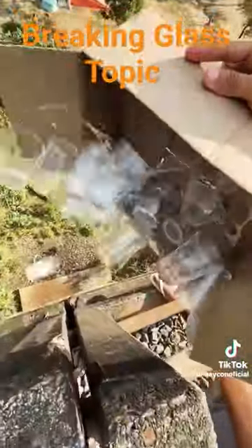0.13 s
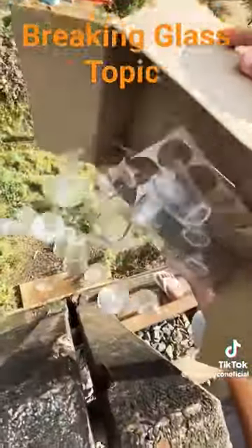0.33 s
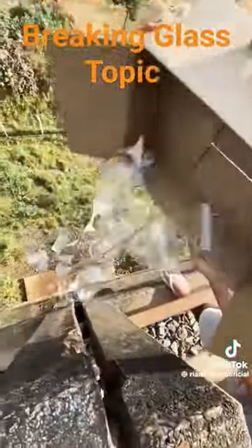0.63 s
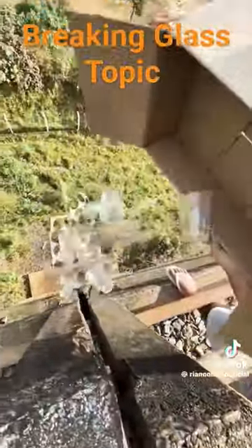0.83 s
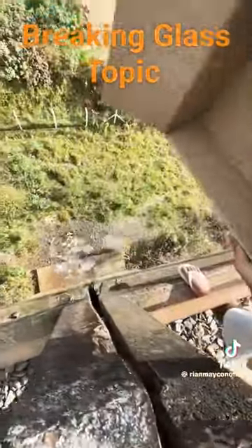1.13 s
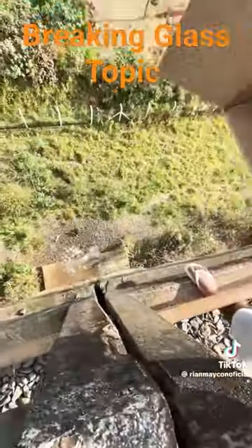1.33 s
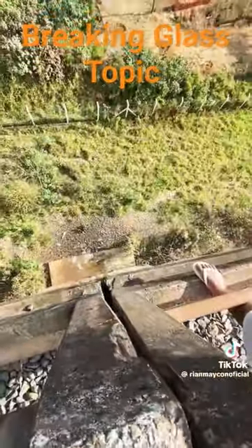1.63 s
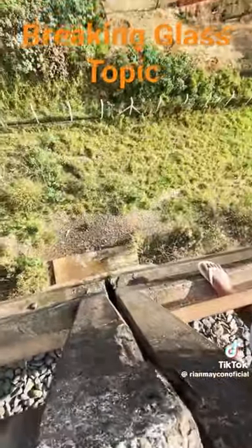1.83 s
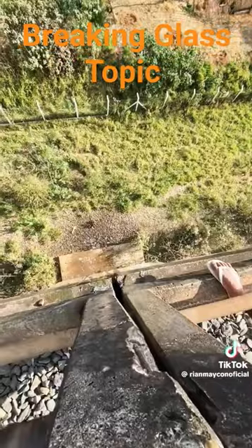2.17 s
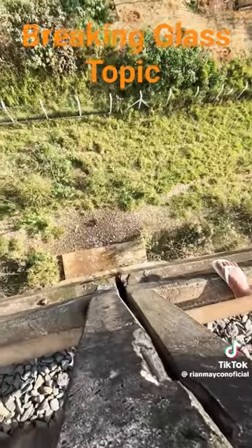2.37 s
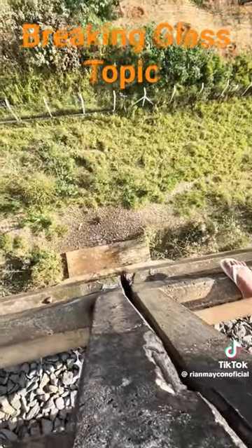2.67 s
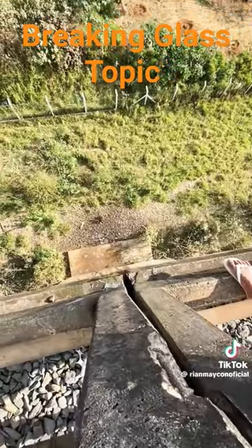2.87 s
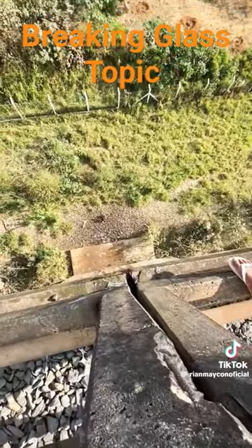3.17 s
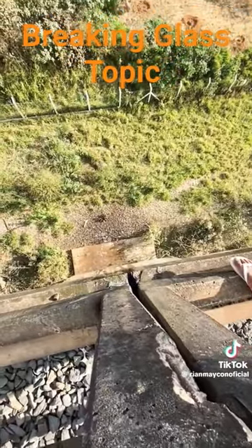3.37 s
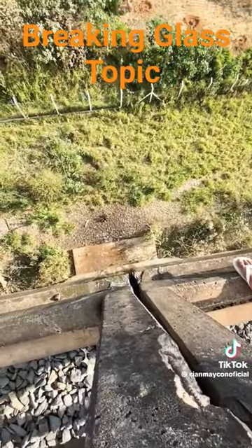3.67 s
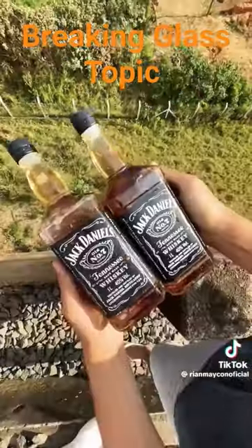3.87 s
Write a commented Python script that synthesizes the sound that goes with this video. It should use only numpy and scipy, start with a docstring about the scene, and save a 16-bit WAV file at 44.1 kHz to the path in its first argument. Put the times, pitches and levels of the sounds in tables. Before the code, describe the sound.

Glass cups grind and chink loudly as they tip from a cardboard box close to the microphone, a few clink in midair, then many smash far below with tinkling shards and light wind.

```python
"""Glass cups grind and chink in a box tipped off a high bridge, then clink freely in the air.
From about two seconds they smash far below; shards tinkle, a few notes ring on, light wind buffets.
Cups are sums of decaying bending modes that beat with spin; heap, splinters and grit are random
contacts through fixed spectra; wind is lumpy low noise. Two microphone ports hear it all in stereo."""
import sys
import numpy as np
from scipy import signal
from scipy.fft import rfft, irfft
from scipy.io import wavfile
from scipy.ndimage import uniform_filter1d

SR = 44100
rng = np.random.default_rng(int(sys.argv[2]) if len(sys.argv) > 2 else 0)


def inscribe(sig):
    """Save sig as 16-bit PCM at rate SR to the path in sys.argv[1].

    A 1-D sig is mono; a 2-D sig holds one channel per row.
    Samples are clipped to [-1, 1] before scaling.
    """
    pcm = np.round(np.clip(np.atleast_2d(sig).T, -1, 1) * 32767)
    wavfile.write(sys.argv[1], SR, pcm.astype(np.int16))


N = 176400  # samples, 4 s

# bending modes of a cup: mode_hz, air_t60_s, heap_t60_s, relative_level_db
CUP_MODES = [(1774.3, 0.9, 0.14, -3.5), (4545, 0.34, 0.21, -0.5), (8259, 0.2, 0.11, -1),
             (11500, .2, 0.14, -16.5), (14480, .15, .1, -33)]
# largest departure of each mode between cups in the heap: [fraction of mode_hz]
MODE_SPREAD = [0.0047, .011, 0.018, 0.012, 0.024]
# spectrum of flying splinters and shards: frequency_hz, relative_level_db
SPLINTER_SPECTRUM = [(300, -78), (700, 3.5), (1000, 1.5), (2500, 3.5), (5000, 5), (7000, 2), (8500, 4),
                     (10500, 5), (12500, -4), (15500, -28)]
HOLLOW_HZ = 940  # nominal resonance of the air in a cup
TICK_S = 0.0019  # decay constant of a tick's scatter


def box():
    """Colliding bodies: random contacts excite a heap of damped cups, with harder knocks on top."""
    # loudness of the sliding heap: time_s, relative_level_db
    heap_curve = [(0.0, -24), (0.018, -24.5), (0.172, -27.5), (0.2, -30.5), (0.348, -30.5), (0.362, -31.5),
                  (0.432, -30), (0.472, -36), (0.74, -34.5), (0.95, -61)]
    # spectrum of glass rattling in cardboard: frequency_hz, relative_level_db
    rattle = [(100, -27), (250, -6.5), (400, 1), (680, -3), (950, -3), (1300, -9.5), (2400, 2),
              (3700, -3.5), (5300, 3), (6800, -7.5), (8500, 2), (10200, -7), (12000, -8.5), (15500, -37.5)]
    # ring of the heap in each cup mode: [relative_level_db]
    heap_ring_db = [-5.5, 0.5, -4.5, -19.5, -33]
    # knocks: start_s, then relative levels peak_db, low_ring_db, middle_ring_db, high_ring_db, clatter_db
    knock_table = [(0.0004, -10.5, -21.5, -16.5, -37.5, -48), (0.0242, -9.5, -22, -28.5, -17.5, -32.5),
                   (0.0543, -3, -18.5, -18.5, -17, -29.5), (0.0836, -10.5, -26, -30.5, -27, -35.5),
                   (0.1132, -30, -32, -21, -21, -33), (0.1214, -11.5, -35, -21, -18.5, -42),
                   (0.1549, -13.5, -28.5, -17.5, -23, -30.5), (0.1624, -6.5, -29.5, -13, -20, -23),
                   (0.2398, -19.5, -26, -21, -25, -23), (0.2931, -20, -32.5, -23, -24.5, -35),
                   (0.311, -14, -29.5, -21.5, -25, -42), (0.3411, -14, -38, -39, -15.5, -26),
                   (0.3503, -9, -50.5, -35.5, -18.5, -40), (0.4001, -16, -34.5, -33.5, -32.5, -26),
                   (0.408, -17, -41.5, -29.5, -20.5, -21.5), (0.4194, -6, -37.5, -35.5, -12, -20),
                   (0.43, -11.5, -35.5, -33, -33.5, -29), (0.4843, -21, -51.5, -39.5, -25, -37.5),
                   (0.5292, -11, -38, -31.5, -35, -46), (0.5608, -20.5, -23, -55.5, -34, -33.5),
                   (0.5957, -21.5, -33.5, -20, -27, -30.5), (0.6043, -12.5, -44.5, -34, -20, -36.5),
                   (0.6132, -25, -21.5, -24.5, -20.5, -29.5), (0.6872, -40.5, -26, -26, -50.5, -33.5),
                   (0.713, -45, -19, -24, -58, -30.5)]
    # trim of the low, middle and high rings of every knock: [gain_db]
    ring_trim_db = [-4, 0.5, 1.5]
    contacts_per_s, clatter_decay_s = 800, 0.0065

    fade = np.clip((1 - np.arange(N) / SR) / .1, 0, 1)  # silent from 1 s on
    slide = level(heap_curve) * fade
    contacts = clicks(N, contacts_per_s, spread_db=2.8)
    hiss = .15 * rng.standard_normal(N)
    out = amp(-4.5) * slide * unit(colour(contacts + hiss, rattle))
    chinks = pings(0, 1, 260, slide, rattle, t60=0.056, low_hz=1870, high_hz=9620, range_db=15)
    out += amp(2) * chinks

    for (hz, _, t60, _), spread, db in zip(CUP_MODES, MODE_SPREAD, heap_ring_db):
        for own in np.linspace(-1, 1, num=6):  # six slightly different cups
            mode = ring(hz * (1 + spread * (own + 0.14 * rng.standard_normal())), t60)
            strikes = unit(clicks(SR, contacts_per_s / 4, spread_db=1.6)) * slide[:SR]
            ringing = signal.fftconvolve(strikes, mode / np.linalg.norm(mode))
            add(out, 0, amp(db - 8) * ringing)

    for s, peak_db, low_db, mid_db, high_db, clatter_db in knock_table:
        rings_db = np.add([low_db, mid_db, high_db], ring_trim_db)
        add(out, s, wall_modes(rings_db, rng.uniform(3, 19), free=False))
        clatter = amp(clatter_db + 7) * snap(rattle, clatter_decay_s)
        peak = amp(peak_db - 20) * snap(rattle, TICK_S)
        add(out, s, clatter + peak)
    return out


def free_cups():
    """Free vibration: a clink is a tick, a hoot of the hollow and the beating ring of a spinning cup."""
    # clinks: start_s, tick_db, hollow_db, low_ring_db, middle_ring_db, high_ring_db, lowest_mode_beat_hz
    clink_table = [(0.717, -35, -50, -37, -19, -51, 2.3), (.7505, -14.5, -44, -36, -45, -54, 2.7),
                   (0.7891, -17, -18.5, -60, -38, -32.5, 19), (0.8052, -30.5, -27, -25, -29.5, -30, 23.8),
                   (0.949, -43.5, -46.5, -40.5, -49.5, -45.5, 2.5),
                   (1.0082, -44.5, -44.5, -63, -48.5, -50, 5.1), (1.0503, -13.5, -25, -42, -41, -43, 10),
                   (1.1886, -13, -30, -22, -28, -32, 13.7), (1.4639, -65, -68, -55, -61, -69, 11.94),
                   (2.8222, -26.5, -29.5, -35, -54.5, -38.5, 26.4), (3.107, -66, -74, -44, -67.5, -48, 7),
                   (3.24, -76, -66, -56, -62, -81, 1.2), (3.768, -60, -83, -54, -47.5, -59.5, 4)]
    # spectrum of the tick: frequency_hz, relative_level_db
    tick_spectrum = [(200, -32.5), (600, 0.5), (1000, 7.5), (2000, 2.5), (3800, 6.5), (6000, -9),
                     (8500, -3), (11000, 0), (15500, -23.5)]
    # weaker modes of a freely struck cup: mode_hz, t60_s, level_relative_to_low_ring_db
    overtones = [(3560, .45, -26), (4620, .14, -8), (6352, .13, -28), (7030, .14, -28)]
    hollow_t60_s = .06

    out = np.zeros(N)
    for s, tick_db, hollow_db, low_db, mid_db, high_db, beat_hz in clink_table:
        add(out, s, amp(tick_db) * snap(tick_spectrum, TICK_S, scatter=0.69))
        hollow_hz = HOLLOW_HZ * (1 + 0.025 * rng.uniform(-1, 1))
        add(out, s, amp(hollow_db) * ring(hollow_hz, hollow_t60_s))
        add(out, s, wall_modes([low_db, mid_db, high_db], beat_hz, free=True))
        spin = 1.26 + 0.27 * np.cos(2 * np.pi * beat_hz * np.arange(SR) / SR)
        weak_modes = sum(amp(low_db + db) * ring(hz, t60) for hz, t60, db in overtones)
        add(out, s, spin * weak_modes)
    return out


def wall_modes(levels_db, beat_hz, free, detune=0.00281):
    """Modal superposition: bending modes of one cup, which spin makes beat, the higher ones faster."""
    t, out = np.arange(SR) / SR, np.zeros(SR)
    for k, (hz, air_t60, heap_t60, db) in enumerate(CUP_MODES):
        spread = detune if free else MODE_SPREAD[k]
        own = 1 + spread * rng.uniform(-1, 1)
        turn = np.pi * beat_hz * (k + 2) / 2 * t
        mode = ring(hz * own, air_t60 if free else heap_t60)
        # the third level serves every higher mode
        out += amp(db + levels_db[min(k, 2)]) * mode * (np.cos(turn) + 0.19)
    return out


def smashes():
    """Brittle fracture: each burst is a broadband crack, a brief hoot and a decaying splinter spray."""
    # smashes: start_s, crack_db, brightness_db_per_octave, hollow_db, spray_db
    smash_table = [(1.8927, -49.5, -4.5, -80, -63), (1.952, -56, 4.5, -74.5, -59),
                   (1.9735, -24.5, -2, -55, -51.5), (2.0604, -41.5, -6, -55, -60),
                   (2.1656, -32.5, 7.5, -43, -54.5), (2.2133, -29, -2.5, -35.5, -42),
                   (2.2222, -20.5, 0, -39, -39.5), (2.241, -34.5, -12, -29, -41),
                   (2.2597, -36, 6, -46, -55), (2.2752, -25, 4, -26.5, -38), (2.3615, -22.5, 1.5, -36, -46),
                   (2.3728, -19.5, -1, -40, -62), (2.448, -64, -2, -65, -56), (2.462, -40.5, 4, -47, -63),
                   (2.5577, -32, 1, -47, -54), (2.6648, -23, -1, -38.5, -42),
                   (2.674, -31.5, 11, -37.5, -61), (2.6838, -24, -1.5, -62, -58),
                   (2.7732, -30.5, 6, -41.5, -44.5), (2.8045, -41, 7, -48, -45.5),
                   (2.8235, -28.5, 12.5, -59, -54), (2.8815, -59, 13, -60, -54),
                   (2.8865, -28, 8.5, -51, -42), (2.9187, -23, -2.5, -50.5, -44),
                   (2.9415, -23.5, 3, -43, -48), (3.08, -45, 8, -48, -48.5), (3.107, -29.5, 11, -67, -49),
                   (3.157, -32.5, 11.5, -70, -63), (3.4128, -40, 15.5, -81, -73),
                   (3.4602, -45, 13, -63, -53.5), (3.4931, -38.5, 18, -89, -67.5),
                   (3.7331, -36.5, 17, -83.5, -58.5), (3.8498, -40.5, 8.5, -94, -72.5)]
    # spectrum of the crack: frequency_hz, relative_level_db
    crack_spectrum = [(200, -37), (650, -20.5), (1100, 3), (2000, 0), (2700, -1), (4500, 0.5),
                      (6500, -12.5), (8500, -14), (11000, -13.5), (15500, -46)]
    crack_decay_s, spray_decay_s, splinters_per_s = .0011, 0.029, 1000

    out, t = np.zeros(N), np.arange(SR // 2) / SR
    for s, crack_db, tilt_db, hollow_db, spray_db in smash_table:
        add(out, s, amp(crack_db) * snap(crack_spectrum, crack_decay_s, tilt_db, scatter=.4))
        hoot = ring(HOLLOW_HZ * rng.uniform(0.95, 1.164), t60=0.041, count=8000)
        add(out, s, amp(hollow_db) * hoot)
        contacts = clicks(len(t), splinters_per_s, spread_db=2.6)
        splinters = unit(contacts + .12 * rng.standard_normal(len(t)))
        spray = colour(splinters * np.exp(-t / spray_decay_s), SPLINTER_SPECTRUM)
        add(out, s, amp(spray_db) * spray)
    return out


def shards():
    """Impact and friction: pieces of many pitches ping and scrape as they come to rest."""
    # loudness of shards skittering over the stones: time_s, relative_level_db
    skitter_curve = [(2.22, -61), (2.342, -54.5), (2.506, -63), (2.666, -59), (2.814, -54), (3.012, -50.5),
                     (3.266, -55.5), (3.722, -58.5), (3.856, -58.5), (4.0, -74.5)]
    # large shards that ring out: start_s, pitch_hz, level_db
    large_shards = [(2.275, 7940, -42), (2.773, 7840, -41), (2.885, 5720, -45.5), (2.942, 6150, -55),
                    (3.107, 6370, -41), (3.157, 9050, -41), (3.201, 6000, -76), (3.35, 3930, -55),
                    (3.411, 8390, -48), (3.418, 4250, -56.5), (3.482, 2980, -54), (3.492, 8870, -45),
                    (3.565, 5940, -68), (3.627, 5850, -48.5), (3.731, 5850, -60), (3.78, 4574, -43),
                    (3.85, 4550, -48)]
    large_t60_s = .2

    start = skitter_curve[0][0]
    loudness = level(skitter_curve) * (np.arange(N) / SR > start)
    tinkle = pings(start, N / SR, 360, loudness, SPLINTER_SPECTRUM, t60=0.069,
                   low_hz=2900, high_hz=11160, range_db=9)
    out = amp(-3) * tinkle
    for s, hz, db in large_shards:
        add(out, s, amp(db) * ring(hz, large_t60_s))
    grit = unit(colour(clicks(N, 410, spread_db=3.6), SPLINTER_SPECTRUM))
    return out + amp(-8.5) * loudness * grit


def pings(start, end, per_s, loudness, spectrum, t60, low_hz, high_hz, range_db, count=900):
    """Random superposition: glassy notes vary in pitch, size and damping under a loudness curve."""
    out = np.zeros(N)
    for when, pitch, size, damping, chance in rng.random((count, 5)):
        if chance < per_s * (end - start) / count:
            s = start + when * (end - start)
            hz = low_hz + (high_hz - low_hz) * pitch
            gain = loudness[min(int(s * SR), N - 1)] * amp(read(spectrum, hz) - range_db * size)
            add(out, s, gain * ring(hz, t60 * (0.27 + 1.8 * damping), count=9000))
    return out


def wind(flutter_db=3.5, apart=0.87):
    """Turbulent pressure: lumpy low noise, partly independent and partly opposed at the two ports."""
    # steady wind: time_s, relative_level_db
    wind_curve = [(0.0, -68.5), (0.31, -65.5), (0.41, -63), (1.35, -63.5), (1.67, -63.5), (1.83, -71.5),
                  (2.19, -62), (2.66, -74), (2.78, -72.5), (3.03, -71), (3.56, -63.5), (4.0, -72.5)]
    # spectrum of the steady wind: frequency_hz, relative_level_db
    gust_spectrum = [(20, -25), (35, -12), (60, 3.5), (130, 1.5), (250, -2), (400, -14.5), (700, -25.5),
                     (1200, -25.5), (3000, -43.5), (8000, -49.5), (15000, -59)]
    # buffets: start_s, length_s, relative_level_db, brightness_db_per_octave
    buffet_table = [(1.011, 0.21, -54.5, 8.5), (1.364, 0.018, -48.5, 5.5), (1.389, 0.075, -49, -3.5),
                    (1.513, 0.068, -47, -5), (1.581, 0.079, -45, 3.5), (1.681, 0.024, -52.5, 4.5),
                    (1.752, 0.09, -48.5, 4.5), (1.819, 0.082, -44, 2.5), (1.956, 0.072, -48.5, 4),
                    (2.115, 0.072, -46.5, -3.5), (2.187, 0.035, -44.5, 3), (2.524, 0.1, -51, -12),
                    (3.016, 0.076, -47, -5), (3.513, 0.11, -60, -0.5)]
    # spectrum of a buffet: frequency_hz, relative_level_db
    buffet_spectrum = [(20, -8), (70, 6), (160, 2), (350, -1.5), (700, -14.5), (1200, -39), (3000, -54),
                       (15000, -74.5)]

    lumps = unit(uniform_filter1d(uniform_filter1d(rng.standard_normal(N), 900), 900))
    flutter = rng.standard_normal((3, N)) * amp(flutter_db * lumps)
    gusts = unit(np.array([colour(x, gust_spectrum) for x in flutter]))
    air = amp(10.5) * level(wind_curve) * gusts
    for s, length, db, tilt_db in buffet_table:
        swell = np.sin(np.pi * np.minimum(np.arange(SR // 4) / SR / length, 1))
        for channel, noise in zip(air, rng.standard_normal((3, SR // 4))):
            add(channel, s, amp(db) * colour(noise * swell, buffet_spectrum, tilt_db))
    opposed = np.array([[1], [-1]]) * air[2]
    return apart * air[:2] + opposed


def space(x, balance, early_db, early_s, tail_db):
    """Reflection and decay: two ports hear direct sound, early reflections and an open-air tail."""
    # decay of the surroundings: frequency_hz, t60_s
    air_t60 = [(300, .7), (1500, 0.99), (5000, 0.53), (9000, 0.77), (15000, .4)]
    # how far the left port leads the right: frequency_hz, phase_rad
    port_phase = [(50, 3), (340, -0.65), (650, -2), (1050, -0.3), (2150, 0.3), (2700, 1.44), (4000, 1.86),
                  (4650, 2.1), (5200, 0.55), (7400, 1.02), (7900, 1.28), (9500, 2.02), (10900, 4),
                  (15200, -3.5)]

    hz = np.fft.rfftfreq(2 * N, 1 / SR)
    side = np.array([[.5], [-.5]])  # half of each difference goes to each port
    t = np.arange(SR) / SR
    taps = rng.standard_normal((2, 2, SR)) * (t > .001)
    early = taps[0] * np.exp(-t / early_s)
    f, when, z = signal.stft(taps[1], SR, nperseg=256)
    decay = amp(-60 * when / read(air_t60, f)[:, None])
    tail = signal.istft(z * decay, SR, nperseg=256)[1][:, :SR]
    room = (amp(early_db) * unit(early) + amp(tail_db) * unit(tail)) / np.sqrt(SR)
    direct = np.exp(1j * side * read(port_phase, hz))
    response = (direct + rfft(room, 2 * N)) * amp(side * read(balance, hz))
    return irfft(rfft(x, 2 * N) * response)[:, :N]


def ring(hz, t60, count=SR):
    """Damped oscillator: one mode builds up quickly and dies away exponentially."""
    rise_s = 0.000567
    t = np.arange(count) / SR
    return (1 - np.exp(-t / rise_s)) * np.sin(2 * np.pi * hz * t) * amp(-60 * t / t60)


def snap(points, decay_s, tilt_db=0, scatter=0.81, count=3000):
    """Impulsive contact: a click and its quick scatter, with the energy of one millisecond at rms 1."""
    push = scatter * rng.standard_normal(count) * np.exp(-np.arange(count) / SR / decay_s)
    push[0] += 1
    x = colour(push, points, tilt_db)
    return x / np.linalg.norm(x) * np.sqrt(SR / 1000)


def clicks(count, per_s, spread_db):
    """Random point process: contacts of uneven size and either sign."""
    size = amp(spread_db * np.minimum(rng.exponential(1, count), 4))
    return size * rng.choice([-1, 1], count) * (rng.random(count) < per_s / SR)


def colour(x, points, tilt_db=0, size=4096):
    """Minimum-phase filtering: a causal unit-energy filter with a spectrum tilted in dB per octave."""
    hz = abs(np.fft.fftfreq(size, 1 / SR))
    tilt = tilt_db * np.log2(np.clip(hz, 200, 9000))
    log_gain = np.log(amp(read(points, hz) + tilt))
    # the Hilbert transform of the log gain supplies the phase
    taps = np.fft.ifft(np.exp(signal.hilbert(log_gain).conj())).real[:size // 2]
    return signal.fftconvolve(x, taps / np.linalg.norm(taps))[:len(x)]


def amp(db):
    """Logarithmic level: decibels to amplitude gain."""
    return 10 ** (np.asarray(db) / 20)


def unit(x):
    """Mean-square normalisation: scales to rms 1."""
    return x / np.sqrt(np.mean(x ** 2) + 1e-20)


def read(points, hz):
    """Logarithmic frequency scale: interpolates a table along log frequency."""
    f, value = np.transpose(points)
    return np.interp(np.log(hz + 1), np.log(f + 1), value)


def level(points):
    """Amplitude envelope: gain over time from a curve in decibels."""
    return amp(np.interp(np.arange(N) / SR, *np.transpose(points)))


def add(mix, s, sound):
    """Linear superposition: adds a sound to the mix from a time in seconds."""
    part = mix[max(round(s * SR), 0):][:len(sound)]
    part += sound[:len(part)]


def scene():
    """Superposition of near and far fields: near cups, far smashes and wind at the ports."""
    # left minus right for near and far sounds: frequency_hz, difference_db
    near_balance = [(60, -3), (120, 3), (240, -1), (480, 2), (950, 3), (1890, -1), (3770, -6), (7520, -1),
                    (15000, -0.5)]
    far_balance = [(60, 5), (130, 2.5), (290, 8), (640, 5.5), (1410, 2), (3100, -4.5), (6820, -2.0),
                   (15000, 2.5)]
    near = space(box() + free_cups(), near_balance, early_db=-9, early_s=.003, tail_db=-34)
    far = space(smashes() + shards(), far_balance, early_db=-7.5, early_s=0.0042, tail_db=-16)
    return near + far + wind()


def record(dry):
    """Linear transduction: the microphone's frequency response, then a low-pass band limit."""
    # response of the microphone: frequency_hz, gain_db
    mic_response = [(20, -1), (60, 1), (9000, 0), (11800, -2), (12800, -9.5), (14500, -3), (15700, -18.5)]
    cutoff_hz = 15700
    gain = amp(read(mic_response, np.fft.rfftfreq(2 * N, 1 / SR)))
    heard = irfft(rfft(dry, 2 * N) * gain)[:, :N]
    low_pass = signal.firwin(511, cutoff_hz, window=("kaiser", 9), fs=SR)
    return signal.oaconvolve(heard, low_pass[None], "same")


dry = scene()
out = record(dry)
inscribe(out)
```